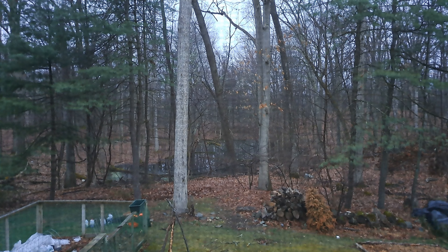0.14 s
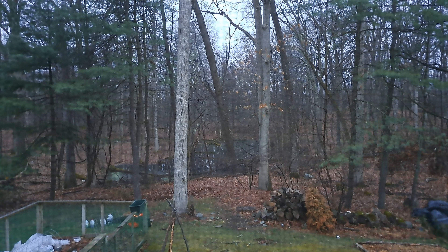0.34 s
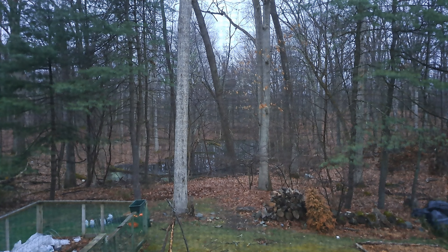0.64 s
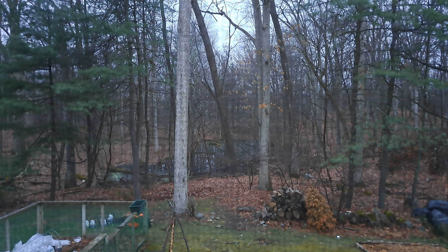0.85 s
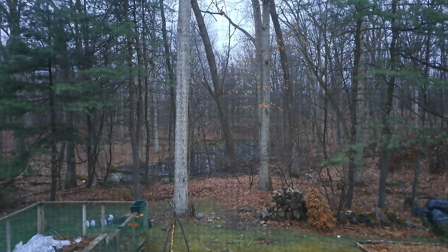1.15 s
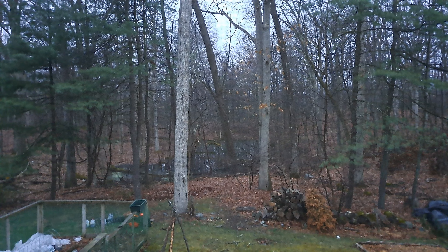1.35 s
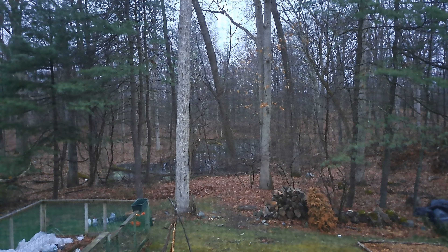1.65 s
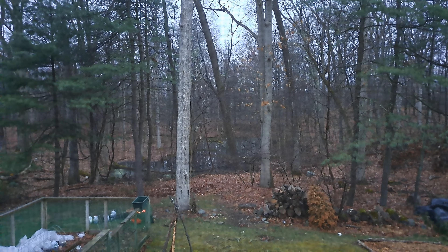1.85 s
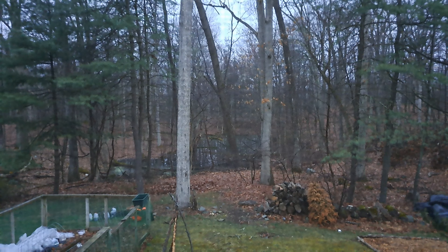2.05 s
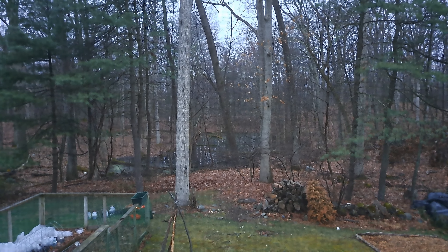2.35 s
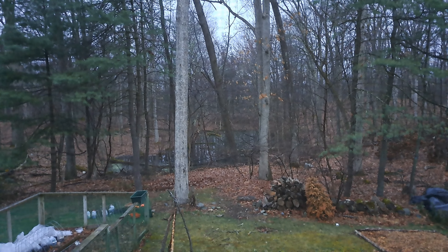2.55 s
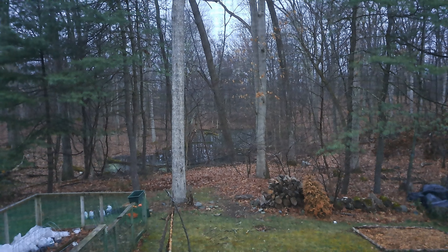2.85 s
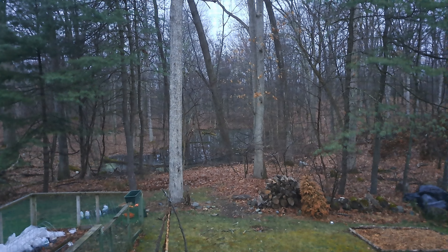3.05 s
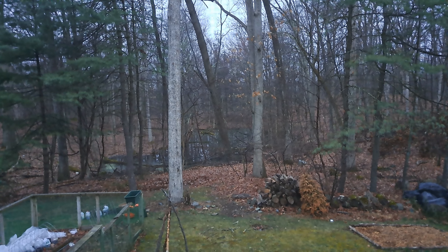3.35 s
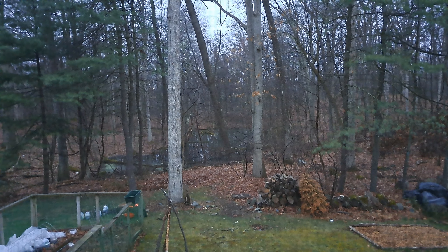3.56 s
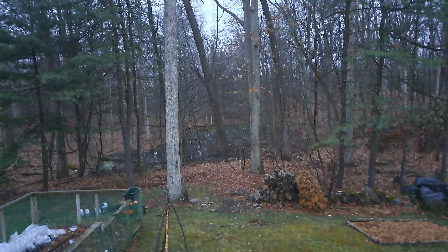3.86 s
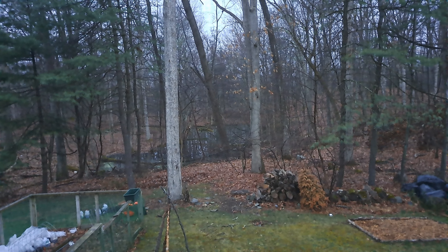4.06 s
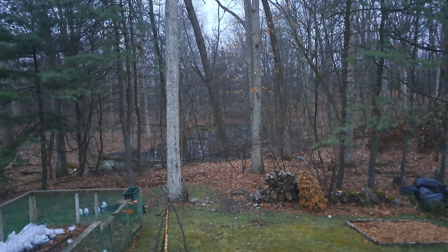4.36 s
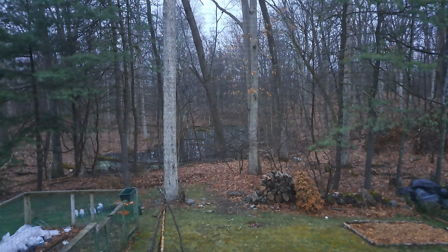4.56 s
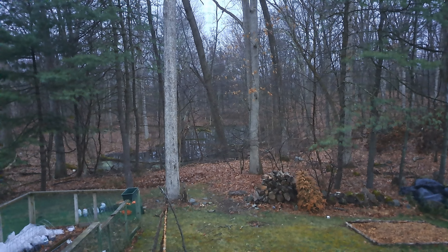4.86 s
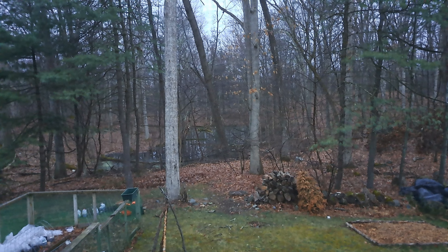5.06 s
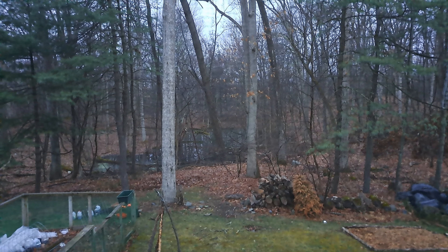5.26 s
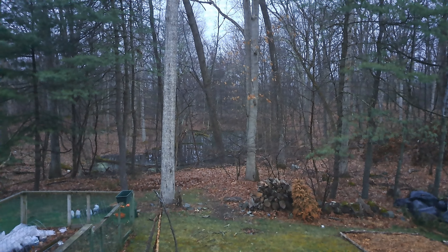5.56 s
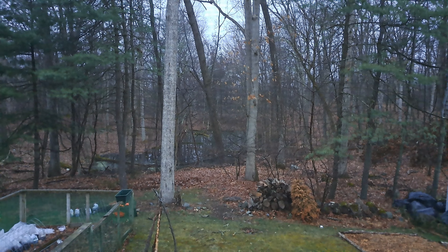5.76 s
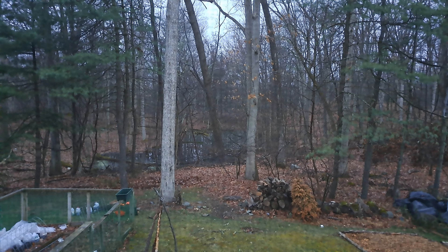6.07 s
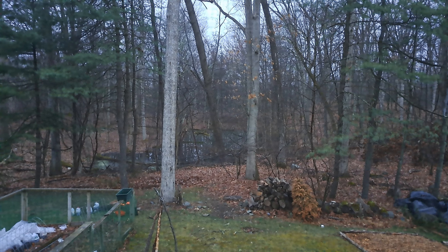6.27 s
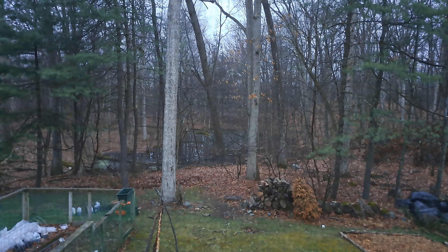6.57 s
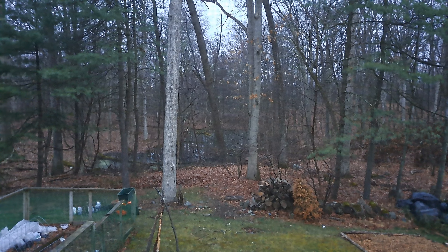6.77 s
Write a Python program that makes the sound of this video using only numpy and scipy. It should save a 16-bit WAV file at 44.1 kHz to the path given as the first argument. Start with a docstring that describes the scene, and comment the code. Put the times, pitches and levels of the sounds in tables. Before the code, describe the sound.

Whistled birdsong, thin buzzy trills and late far yelps ring through bare woods behind a yard, above deep distant traffic drone.

```python
"""Three birds trade rising whistles at dawn in bare woodland behind a yard: voices on bending pitch curves.
A nearer bird, right of the microphones, gives thin chips and wavy trills; a far one sends a run of yelps.
Softer calls, far twitters, stirring leaves and one twig snap fill the gaps. Trunks scatter the birds and
the snap into a long tail of decaying echoes. Under it all lies distant traffic: filtered noise and a drone
of many tones crowded round one pitch, beating into a throb."""
import sys
import numpy as np
from scipy import signal
from scipy.fft import rfft, irfft, next_fast_len
from scipy.io import wavfile

SR = 44100
rng = np.random.default_rng(int(sys.argv[2]) if len(sys.argv) > 2 else 0)


def log_audio(samples):
    """Write samples as a 16-bit WAV file to the path given in sys.argv[1]."""
    # one column per channel
    frames = np.atleast_2d(samples).T
    # limit to full scale, then quantise
    limited = np.clip(frames, -1, 1)
    pcm = np.round(limited * 32767).astype(np.int16)
    wavfile.write(sys.argv[1], SR, pcm)


N = 305613
TIME = np.arange(N) / SR


def amp(db):
    """Decibels to gain."""
    return 10 ** (np.asarray(db) / 20)


def unit(x):
    """Scales to rms 1."""
    return x / np.sqrt(np.mean(x ** 2) + 1e-20)


def read(points, hz):
    """Reads a table on a log-frequency axis."""
    f, value = np.transpose(points)
    return np.interp(np.log(hz + 1), np.log(f + 1), value)


def wander(size, hz):
    """Smooth random movement of about rms 1, with little of it faster than hz."""
    full = next_fast_len(size + SR // 10)
    f = np.fft.rfftfreq(full, 1 / SR)
    lowpass = np.exp(-(f / hz) ** 2)
    return unit(irfft(rfft(rng.standard_normal(full)) * lowpass, full))[:size]


def add(mix, s, sound):
    """Lays a stereo sound into the mix at time s, cutting whatever falls outside it."""
    start = round(s * SR)
    sound = sound[:, max(-start, 0):]
    part = mix[:, max(start, 0):][:, :sound.shape[1]]
    part += sound[:, :part.shape[1]]


def perch(wet_db, near_db, lead_ms, right_db):
    """A bird's place: deep and near echo levels, the left microphone's lead, the right one's extra level."""
    return wet_db, near_db, lead_ms, right_db


# how long the deep wood rings: (frequency [Hz], decay time to -60 dB [s])
FOREST_DECAY = [(1000, 2.67), (2700, 1.314), (4500, 0.64), (6800, 0.88), (13000, 0.48)]


def forest(x, wet_db, near_db, lead_ms, right_db):
    """The direct path, a quick scatter from nearby trunks, and the long tail of the deep wood."""
    size = 49152
    # sparse random echoes, about 6 % of the samples
    taps = rng.standard_normal((2, size)) * (rng.random((2, size)) < .06)
    # sound from the sides reaches the two microphones out of step
    taps = taps - 0.022 * taps[::-1]
    # each frequency band of the tail dies at its own rate
    hz, t, z = signal.stft(taps, SR, nperseg=256)
    decay = amp(-60 * t / read(FOREST_DECAY, hz)[:, None])
    tail = signal.istft(z * decay, SR, nperseg=256)[1][:, :size]
    t = np.arange(size) / SR
    scatter = taps * amp(-60 * t / 0.19)
    tail = tail * (1 - np.exp(-t / 0.038))  # the deep wood answers gradually
    deep_echoes = amp(wet_db) * tail / np.linalg.norm(tail[0])
    near_echoes = amp(near_db) * scatter / np.linalg.norm(scatter[0])
    hz = np.fft.rfftfreq(2 * size, 1 / SR)
    # half the lead advances the left side, half delays the right
    direct = np.exp(-1j * np.pi * hz * np.array([[-1], [1]]) * lead_ms / 1000)
    heard = irfft(rfft(x, 2 * size) * (direct + rfft(deep_echoes + near_echoes, 2 * size)))[:, :size]
    return heard * amp([[-max(right_db, 0)], [min(right_db, 0)]])


def envelope(t, attack_s, release_s, grow_db):
    """A soft attack, a hold that grows by grow_db on the way to the end, and a soft release."""
    edges = np.minimum(t / attack_s, 1) * np.minimum((t[-1] - t) / release_s, 1)
    return np.sin(np.pi / 2 * edges) ** 2 * amp(grow_db * (t / t[-1] - .5))


# what a plain throat and open beak let through: (frequency [Hz], gain [dB])
EVEN_THROAT = [(1000, -3.5), (16000, -2)]


def syrinx(hz, overtones_db, order=1, throat=EVEN_THROAT, buzz=0, buzz_hz=190, jitter=0.001):
    """A tone whose harmonic number `order` follows hz, with a growing buzz and slight unsteadiness."""
    t = np.arange(len(hz)) / SR
    waver = wander(SR // 2, 110)[:len(t)]
    flutter_db = 2.27 * wander(SR // 2, 60)[:len(t)]
    growing_buzz = buzz * t / t[-1] * np.sin(2 * np.pi * buzz_hz * t)
    hz = hz / order * (1 + jitter * waver + growing_buzz)
    phase = 2 * np.pi * np.cumsum(hz) / SR
    tone = 0
    for k, overtone_db in enumerate(overtones_db, 1):
        audible = k * hz < SR / 2
        tone = tone + amp(overtone_db + read(throat, k * hz)) * np.sin(k * phase) * audible
    return np.sqrt(2) * tone * amp(flutter_db)


CATCH_AT, CATCH_LENGTH = 0.33, 0.028  # centre and half-width of a brief dip in level (shares of the note)


def sing(notes, pitches, overtones_db, place, attack_s, release_s, grow_db, catch_db=0, **voice):
    """Each note bends smoothly through the pitches of its kind, under one envelope."""
    out = np.zeros((2, N))
    bend = np.polyfit(np.linspace(0, 1, len(pitches)), pitches, len(pitches) - 1)
    for s, length, db, pitch_factor in notes:
        t = np.arange(0, length, 1 / SR)
        catch = np.exp(-((t / length - CATCH_AT) / CATCH_LENGTH) ** 2)
        swell = amp(db + catch_db * catch) * envelope(t, attack_s, release_s, grow_db)
        tone = syrinx(pitch_factor * np.polyval(bend, t / length), overtones_db, **voice)
        add(out, s, forest(swell * tone, *place))
    return out


# what a whistler's throat lets through: (frequency [Hz], gain [dB])
WHISTLE_THROAT = [(1300, 2.5), (3200, 0.5), (3500, -3), (4000, 10.5), (4300, -6.5), (4550, 4.5),
                  (4750, 12.5), (5200, -6), (6400, 1.5)]
# long rises of the far whistler: (time [s], length [s], level before the throat [dB], pitch factor)
LONG_RISES = [(-.3, 0.22, -51.5, 1.01), (.034, .21, -46.5, 0.97), (.954, 0.28, -53, 1.01),
              (2.829, .19, -51, 1.006), (3.744, .2, -50.5, .99), (4.772, 0.2, -50, 1),
              (6.04, 0.21, -51, .99)]
# their pitch before the factor, at even steps from start to end: [Hz]
LONG_RISE_HZ = [2744, 3037, 3163]
# short rises of the near whistler: (time [s], length [s], level before the throat [dB], pitch factor)
SHORT_RISES = [(0.032, .2, -54.5, 0.97), (1.314, 0.15, -43, .99), (2.622, .16, -44, 1),
               (4.04, 0.15, -44.5, 0.97), (5.089, .18, -44.5, .99), (6.242, 0.17, -44, 0.98)]
# their pitch before the factor, at even steps from start to end: [Hz]
SHORT_RISE_HZ = [2734, 2933, 3136]
# a soft grace note leads into each short rise; its pitch from start to end, before the factor: [Hz]
GRACE_HZ = [2680, 2724]
GRACE_AHEAD_S, GRACE_LENGTH_S, GRACE_DB = .038, .032, -18  # level relative to the rise it leads into


def high_whistlers():
    """Two birds with clear rising notes; each throat picks out the second harmonic and leaks the third."""
    far = perch(wet_db=-9, near_db=-7, lead_ms=.13, right_db=-2)
    near = perch(wet_db=-18, near_db=-14, lead_ms=.122, right_db=.7)
    voice = dict(order=2, throat=WHISTLE_THROAT, jitter=.004)
    long = sing(LONG_RISES, LONG_RISE_HZ, [-50, -.5, -26.5, -32.5], far,
                attack_s=0.015, release_s=0.017, grow_db=0.5, **voice)
    graces = [(s - GRACE_AHEAD_S, GRACE_LENGTH_S, db + GRACE_DB, pitch_factor)
              for s, _, db, pitch_factor in SHORT_RISES]
    soft = sing(graces, GRACE_HZ, [-50, 0], near,
                attack_s=.008, release_s=0.0088, grow_db=-1.5, **voice)
    short = sing(SHORT_RISES, SHORT_RISE_HZ, [-50.5, .5, -28.0, -44.5], near,
                 attack_s=0.021, release_s=0.02, grow_db=1.5, catch_db=-17, **voice)
    return long + soft + short


# low slurs leap once, then creep upward: (time [s], length [s], level before the throat [dB],
# pitch before the leap [Hz], middle of the leap after the start [s], time scale of the leap [s],
# deep echo level [dB])
SLURS = [(-.2, 0.2, -43.5, 2000, 0.066, .0105, -10), (.2, .205, -55, 2022, 0.077, 0.02, -5),
         (2, 0.11, -47, 1985, 0.085, .008, -9.5), (2.265, 0.19, -39.5, 2007, 0.067, 0.011, -12.5),
         (2.611, 0.21, -38, 2017, .07, 0.011, -11), (2.975, .08, -56, 2040, 0.056, .0105, -23),
         (3.196, .215, -57.5, 2049, .092, 0.019, -5.5), (3.554, 0.18, -59, 2024, 0.084, 0.019, -3.5)]
CREEP_HZ_PER_S, LEAP_HZ = 1450, 528


def low_whistler():
    """Slurs leap in pitch and loudness together; the throat picks out the second harmonic."""
    out = np.zeros((2, N))
    for s, length, db, first_hz, leap_at, leap_s, wet_db in SLURS:
        t = np.arange(0, length, 1 / SR)
        leap = 1 / (1 + np.exp((leap_at - t) / leap_s))
        creep_hz = CREEP_HZ_PER_S * np.maximum(t - leap_at, 0)
        tone = syrinx(first_hz + LEAP_HZ * leap + creep_hz, [-55, -2.0, -43, -45],
                      order=2, throat=WHISTLE_THROAT, jitter=0.0044)
        soft_db = -9 * (1 - leap)
        swell = amp(db + soft_db) * envelope(t, attack_s=0.056, release_s=0.019, grow_db=8)
        place = perch(wet_db=wet_db, near_db=-5.5, lead_ms=-0.11, right_db=-2.5)
        add(out, s, forest(tone * swell, *place))
    return out


# chips sweep up and level off: (time [s], length [s], level before the throat [dB],
# pitch approached at the top [Hz], octave level before the throat, relative to that level [dB])
CHIPS = [(-.04, 0.03, -44, 7100, -30), (1.072, 0.03, -38.5, 7850, -31.5), (3.016, 0.025, -37.5, 7070, -24),
         (5.173, 0.028, -43, 7000, -24.5)]
CHIP_FOOT_HZ, CHIP_HZ_PER_S = 4780, 330000  # starting pitch and starting speed of the sweep


def chips():
    """A small bird close on the right chips upward; its beak beams the octave away, into the trunks."""
    out = np.zeros((2, N))
    chipping = perch(wet_db=-7, near_db=-3, lead_ms=.04, right_db=15)
    beamed = perch(wet_db=5, near_db=4.0, lead_ms=.02, right_db=23)
    for s, length, db, top_hz, octave_db in CHIPS:
        t = np.arange(0, length, 1 / SR)
        span = top_hz - CHIP_FOOT_HZ
        hz = top_hz - span * np.exp(-t * CHIP_HZ_PER_S / span)
        swell = amp(db) * envelope(t, attack_s=0.011, release_s=.004, grow_db=-17)
        add(out, s, forest(swell * syrinx(hz, [-2.5], buzz=0.022), *chipping))
        add(out, s, forest(swell * syrinx(2 * hz, [octave_db]), *beamed))
    return out


# how alike the two microphones hear the noise: (frequency [Hz], likeness [-1 to 1])
LIKENESS = [(30, 1), (70, 0.98), (125, 0.96), (250, 0.94), (500, 0.44), (900, 0.03), (2000, -0.52),
            (4000, 0.11), (9000, -0.032)]
# how the noise leans between them: (frequency [Hz], left minus right [dB])
BALANCE = [(60, 2), (250, -1.5), (500, 1), (1200, 4), (2500, 3.5), (4000, 2), (7000, -3), (13000, -2)]


def stereo_noise(spectrum):
    """Diffuse noise of rms 1 at two microphones, alike in the bass and less so in the treble."""
    hz = np.fft.rfftfreq(N, 1 / SR)
    a, b = rfft(rng.standard_normal((2, N)))
    same = np.clip(read(LIKENESS, hz), -1, 1)
    pair = np.array([a, same * a + np.sqrt(1 - same ** 2) * b])
    pair = pair * amp(np.array([[.5], [-.5]]) * read(BALANCE, hz))
    return unit(irfft(pair * amp(read(spectrum, hz)), N))


# uneven surges and sudden drops of the drone, before its pulse and the lean to the right:
# (time [s], level [dB])
DRONE_LEVEL = [(0.0, -55), (0.19, -47.5), (1.27, -54), (1.39, -43.5), (1.75, -57), (2.41, -48), (2.47, -64),
               (2.82, -49.5), (4.01, -54.5), (4.09, -48), (4.53, -60), (4.63, -39), (4.71, -61),
               (4.82, -48.5), (5.08, -62.5), (5.96, -48.5), (6.1, -66), (6.18, -46.5), (6.6, -48.5),
               (6.93, -61.5)]
DRONE_HZ, DRONE_SPREAD_HZ = 68.2, 8.1
THROB_DEPTH = 0.59  # exponent on the beating: 0 is steady, 1 is the full natural beat
PULSE_EVERY_S, PULSE_AT_S, PULSE_DB = .433, 0.18, 2  # an even beat, this far up and down


def drone():
    """Many far engines in one narrow band of pitch; their beating makes the throb."""
    hz = np.fft.fftfreq(next_fast_len(N), 1 / SR)
    band = np.exp(-((hz - DRONE_HZ) / DRONE_SPREAD_HZ) ** 4)
    engines = np.fft.ifft(band * np.exp(2j * np.pi * rng.random(len(hz))))[:N]
    throb = unit(np.cos(np.angle(engines)) * abs(engines) ** THROB_DEPTH)
    pulse_db = PULSE_DB * np.cos(2 * np.pi * (TIME - PULSE_AT_S) / PULSE_EVERY_S)
    level_db = np.interp(TIME, *np.transpose(DRONE_LEVEL)) + pulse_db
    return throb * amp(level_db) * amp([[-.2], [1]])


# colour of the traffic rumble: (frequency [Hz], relative level per Hz [dB])
TRAFFIC_COLOUR = [(20, -23.5), (35, -10), (50, 1), (68, -4.5), (86, -2), (108, -1.5), (140, 1.5), (175, -4),
                  (210, -1), (270, -7.5), (380, -10), (520, -20), (750, -25), (1100, -36.5), (1800, -47.5),
                  (4000, -84)]
# rise and fall of the rumble about its set level: (time [s], level change [dB])
TRAFFIC_SWELL = [(0, 1), (2.4, 0.5), (3.6, -0.5), (4.7, -0.8), (5.6, -2), (6.2, -0.5), (6.9, -1.4)]
# colour of the hiss: (frequency [Hz], relative level per Hz [dB])
AIR_COLOUR = [(900, -10.5), (1400, -18.5), (2500, 8), (3600, -5.5), (5000, -12.5), (7000, -1), (9200, -14),
              (13000, -8), (15500, -13)]
TRAFFIC_DB, AIR_DB = -52, -73.5  # the rumble's level before its swell, the hiss's level


def background():
    """Far traffic: a broad rumble of noise and the engine drone, under a faint steady hiss."""
    swell_db = np.interp(TIME, *np.transpose(TRAFFIC_SWELL)) + .5 * wander(N, 4.8)
    rumble = stereo_noise(TRAFFIC_COLOUR) * amp(TRAFFIC_DB + swell_db)
    return rumble + drone() + amp(AIR_DB) * stereo_noise(AIR_COLOUR)


# thin far voices: (time [s], length [s], first pitch [Hz], last pitch [Hz], rms waver [Hz],
# peak level before the wood [dB])
TWITTERS = [(0.223, 0.17, 7700, 7570, 89, -86), (0.658, 0.056, 6490, 6500, 40, -78),
            (0.661, 0.059, 7570, 7800, 51.66, -82), (1.296, 0.025, 5490, 5120, 298, -65),
            (1.329, 0.2, 4000, 3950, 408, -73), (1.428, 0.21, 4740, 4680, 221, -70.5),
            (2.009, 0.26, 7920, 7400, 201, -83), (2.607, .03, 5600, 5100, 350, -70.5),
            (2.617, 0.13, 6950, 7300, 450, -75.5), (3.754, 0.043, 5420, 5280, 247, -76.5),
            (5.543, 0.15, 5230, 4750, 160, -80.5), (6.058, 0.04, 7290, 7300, 160, -80),
            (6.29, 0.042, 7300, 7120, 604, -63)]


def twitters():
    """Thin wavering voices, each a single sine tone, blurred by distance."""
    out = np.zeros((2, N))
    canopy = perch(wet_db=3.0, near_db=8.5, lead_ms=0.029, right_db=7.5)
    for s, length, first_hz, last_hz, waver_hz, db in TWITTERS:
        size = int(length * SR)
        hz = np.linspace(first_hz, last_hz, size) + waver_hz * wander(SR // 2, 130)[:size]
        tone = np.sin(2 * np.pi * np.cumsum(hz) / SR)
        add(out, s, forest(amp(db) * tone * signal.windows.tukey(size, .5), *canopy))
    return out


# what the trilling throat lets through: (frequency [Hz], gain [dB])
TRILL_THROAT = [(5200, -17), (6000, -6), (6800, 1.5), (7500, -7.5), (8200, -23), (12000, 2)]
# trills swing about a sinking centre: (time [s], length [s], level before the throat [dB])
TRILLS = [(0.775, 0.18, -47), (2.299, 0.17, -40.5), (3.359, 0.182, -45)]
TRILL_HZ, SINK_HZ_PER_S, SWING_HZ, SWING_S = 7460, 6800, 849, .071  # first centre, sink, swing, its period
CREST = .14  # the swing has pointed crests and wide troughs (0-1)
# one thin seet: (time [s], length [s], level before the throat [dB], pitch factor)
SEETS = [(6.383, 0.052, -33, 0.98)]
# its pitch before the factor, at even steps from start to end: [Hz]
SEET_HZ = [6850, 7450, 7390]


def trills():
    """The same small bird swings its pitch, ever louder and buzzier, and ends with a thin seet."""
    out = np.zeros((2, N))
    trilling = perch(wet_db=-15.5, near_db=-10, lead_ms=0.029, right_db=11.5)
    facing = perch(wet_db=-23, near_db=-17, lead_ms=.012, right_db=18)
    for s, length, db in TRILLS:
        t = np.arange(0, length, 1 / SR)
        turn = 2 * np.pi * t / SWING_S
        swing = np.cos(turn) + CREST * np.cos(2 * turn)
        hz = TRILL_HZ - SINK_HZ_PER_S * t + SWING_HZ * swing
        tone = syrinx(hz, [-6, -48], throat=TRILL_THROAT, buzz=0.08, buzz_hz=188, jitter=0.0052)
        swell = amp(db) * envelope(t, attack_s=0.048, release_s=.012, grow_db=13.5)
        add(out, s, forest(tone * swell, *trilling))
    seet = sing(SEETS, SEET_HZ, [-2, -47], facing,
                attack_s=0.013, release_s=.006, grow_db=-6, jitter=0.0088)
    return out + seet


# stirrings in dry leaves: (time [s], length [s], level before the flurry's shape [dB])
RUSTLES = [(1.3, 0.42, -73), (2.3, 0.99, -77), (4.015, 0.35, -72), (4.453, 0.42, -67), (4.863, 0.46, -77),
           (5.498, 0.91, -72), (6.07, 0.64, -66.5)]
# colour of the leaves: (frequency [Hz], relative level per Hz [dB])
LEAF_COLOUR = [(700, -28), (1500, 0), (3500, 3.5), (7000, -1), (9200, -20), (12000, -12), (15500, -16)]


def leaves():
    """Dry leaves stir in short flurries of noise that start quickly, flutter and die away."""
    level = np.zeros(N)
    for s, length, db in RUSTLES:
        corners = [s, s + length / 10, s + length / 2, s + length]
        # the end values also hold outside the flurry, as a faint bed
        level += amp(db) * np.interp(TIME, corners, [0.085, 0.59, 0.9, 0.015])
    flutter_db = 1.67 * wander(N, 110)
    return stereo_noise(LEAF_COLOUR) * level * amp(flutter_db)


# two-voiced dipping calls: (time [s], length [s], level before the throat [dB], pitch factor)
DIPS = [(1.763, 0.057, -62.5, .98), (4.519, 0.052, -62, 1.03), (5.82, 0.061, -61, 1),
        (6.082, .056, -63.5, 1.09)]
# pitch of their low voice before the factor, at even steps from start to end: [Hz]
DIP_LOW_HZ = [3300, 2850, 2650, 3280, 4400]
# pitch of their high voice, likewise: [Hz]
DIP_HIGH_HZ = [5750, 6340, 6030, 6350, 7500]
# arching calls: (time [s], length [s], level before the throat [dB], pitch factor)
ARCHES = [(4.974, 0.072, -74, 0.92), (5.22, .066, -67, .87), (6.688, 0.057, -63, 0.98)]
# their pitch before the factor, at even steps from start to end: [Hz]
ARCH_HZ = [2887, 3250, 3360, 2230]
# falling chups: (time [s], length [s], level before the throat [dB], pitch factor)
CHUPS = [(1.384, 0.053, -75, .88), (2.909, 0.047, -70.5, 0.91), (4.098, .047, -66, 0.96),
         (5, .04, -74, 0.9), (5.254, 0.0396, -66, .89), (5.497, 0.039, -61.5, 0.98),
         (6.701, 0.049, -62, .97)]
# their pitch before the factor, at even steps from start to end: [Hz]
CHUP_HZ = [1960, 1870, 1450]


def callers():
    """Two-voiced dipping calls, arching calls and soft falling chups from the undergrowth."""
    bush = perch(wet_db=-10, near_db=-5, lead_ms=.08, right_db=-1)
    bush_high = perch(wet_db=-13, near_db=0, lead_ms=0.051, right_db=10.5)
    deep = perch(wet_db=-12, near_db=-7, lead_ms=.16, right_db=1)
    chups = sing(CHUPS, CHUP_HZ, [0], deep,
                 attack_s=0.0077, release_s=0.0065, grow_db=-4.5, jitter=.025)
    dips = sing(DIPS, DIP_LOW_HZ, [4, -15], bush,
                attack_s=0.0084, release_s=0.0024, grow_db=4.5, jitter=0.023)
    dips += sing(DIPS, DIP_HIGH_HZ, [3], bush_high,
                 attack_s=0.016, release_s=0.0096, grow_db=-9, jitter=.02)
    arches = sing(ARCHES, ARCH_HZ, [0], bush,
                  attack_s=.006, release_s=0.0025, grow_db=12, jitter=0.02)
    return chups + dips + arches


# twig snaps: (time [s], level before the modes' own [dB])
SNAPS = [(4.722, -43)]
# modes of the wood: (frequency [Hz], starting level [dB], decay time to -60 dB [s])
WOOD_MODES = [(314, 7, 0.023), (640, 0, 0.012), (1320, -8, 0.017), (2290, -11, 0.017)]


def twigs():
    """A dry snap rings a few short wooden modes, left of the microphones."""
    out = np.zeros((2, N))
    t = np.arange(SR // 10) / SR
    ring = sum(amp(db - 60 * t / t60) * np.sin(2 * np.pi * hz * t) for hz, db, t60 in WOOD_MODES)
    for s, db in SNAPS:
        place = perch(wet_db=-13, near_db=-0.5, lead_ms=0.026, right_db=-6.5)
        add(out, s, forest(amp(db) * ring, *place))
    return out


# pitch of a yelp before the run's sag, at even steps from start to end: [Hz]
YELP_HZ = [641.6, 718, 717]
# the run keeps an even beat, swells to its middle and sags in pitch
YELP_START_S, YELP_EVERY_S, YELP_LENGTH_S, YELP_COUNT = 5.45, .166, 0.0723, 9
YELP_DB, YELP_PEAK_S, YELP_FADE_DB_PER_S2 = -54.5, 6.01, 10  # top level before the throat, its time, fade
YELP_SAG_PER_S = 0.0362  # share of the pitch


def yelper():
    """A far bird's even run of nasal, arched yelps, strongest in the third harmonic."""
    deep = perch(wet_db=-12.5, near_db=-7, lead_ms=.16, right_db=1)
    notes = []
    for s in YELP_START_S + YELP_EVERY_S * np.arange(YELP_COUNT):
        db = YELP_DB - YELP_FADE_DB_PER_S2 * (s - YELP_PEAK_S) ** 2
        pitch_factor = 1 - YELP_SAG_PER_S * (s - YELP_START_S)
        notes.append((s, YELP_LENGTH_S, db, pitch_factor))
    return sing(notes, YELP_HZ, [-43, -15.5, -1.5, -21, -41, -27], deep,
                attack_s=0.0096, release_s=0.012, grow_db=11, jitter=0.0216)


def scene():
    """All the birds, the woodland floor and the traffic."""
    whistlers = high_whistlers() + low_whistler()
    small_bird = chips() + trills()
    others = twitters() + callers() + yelper()
    floor = leaves() + twigs()
    return whistlers + small_bird + others + floor + background()


def record(dry):
    """The recorder's band limit: a steep low-pass filter at 15.7 kHz."""
    lowpass = signal.firwin(511, 15700, window=("kaiser", 9), fs=SR)
    return signal.oaconvolve(dry, lowpass[None], "same")


dry = scene()
out = record(dry)
log_audio(out)
```